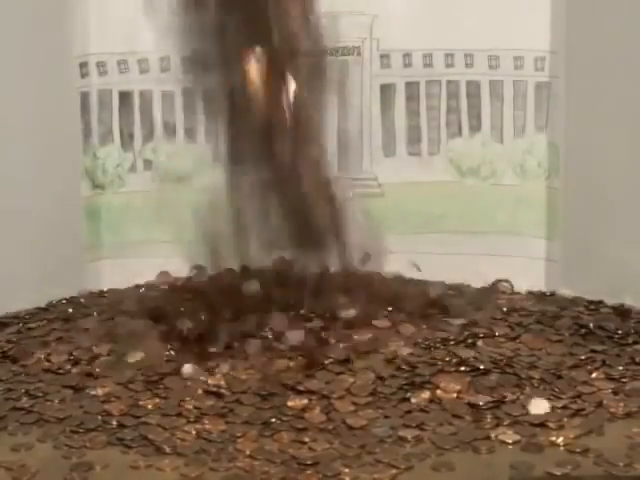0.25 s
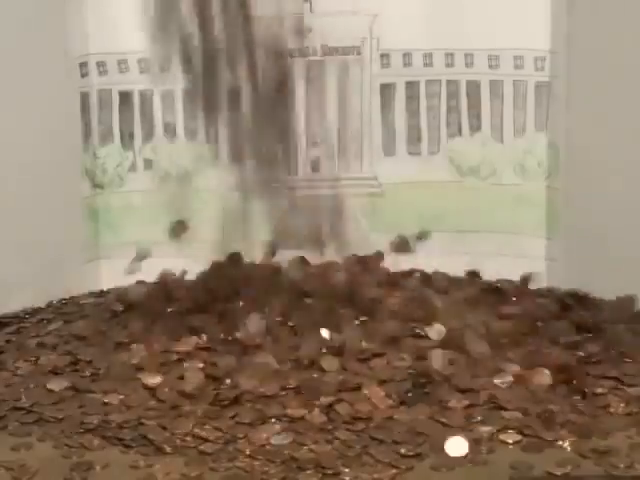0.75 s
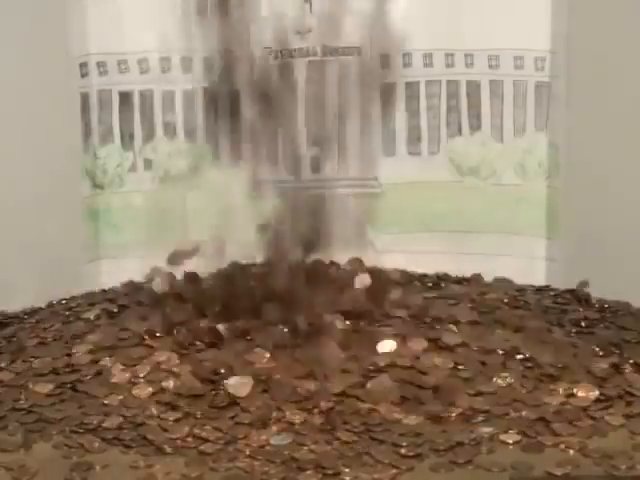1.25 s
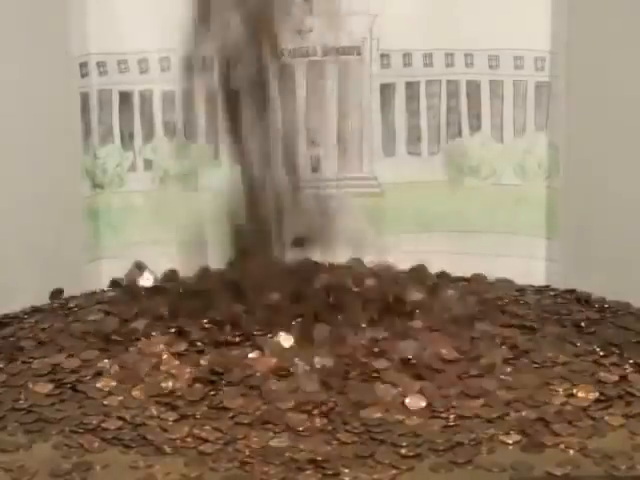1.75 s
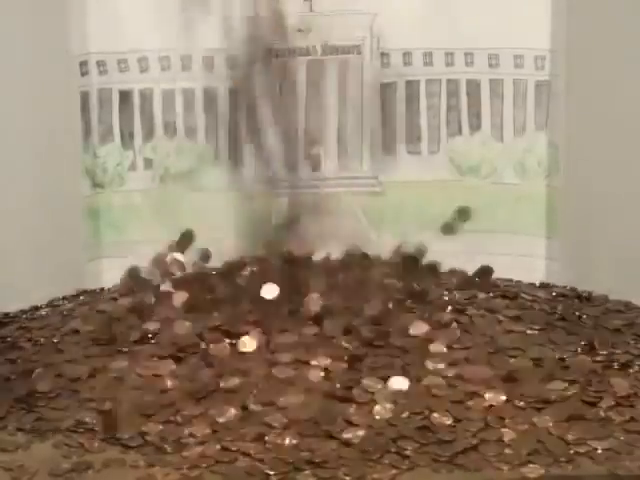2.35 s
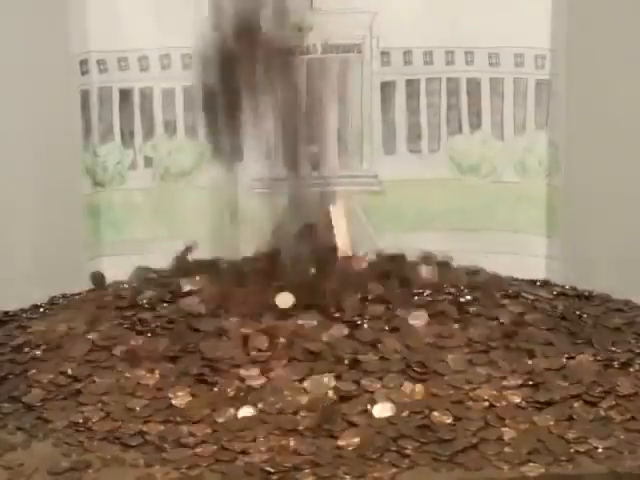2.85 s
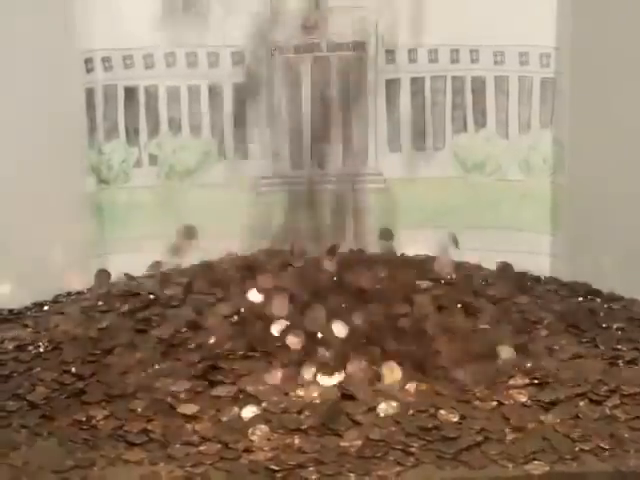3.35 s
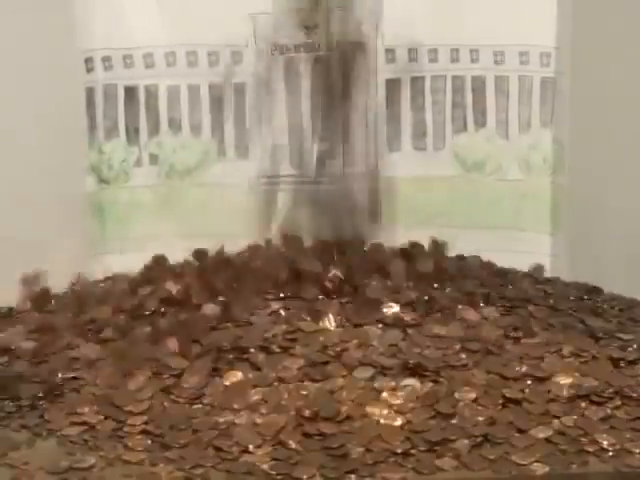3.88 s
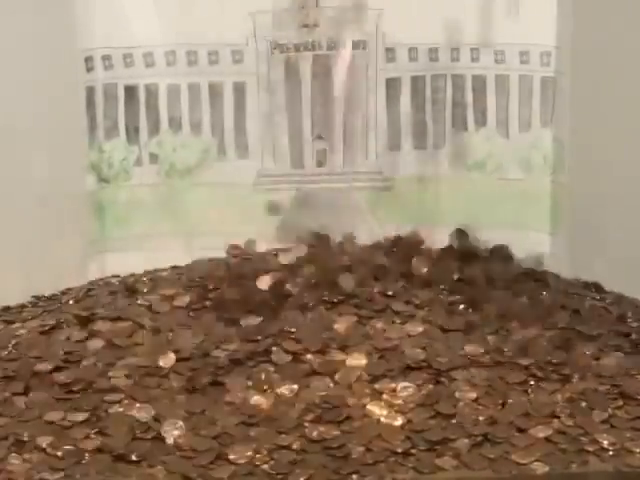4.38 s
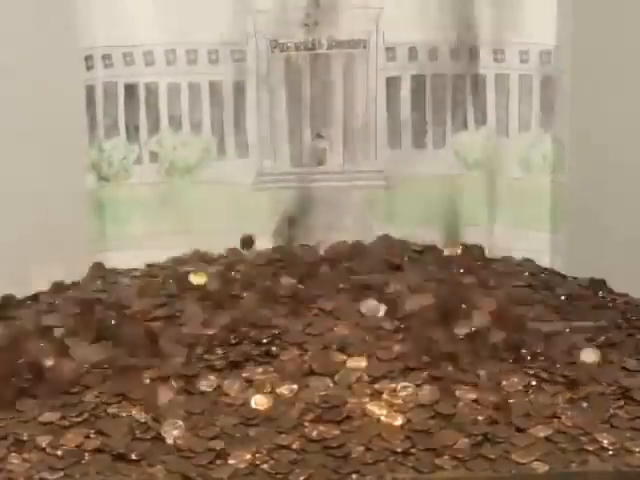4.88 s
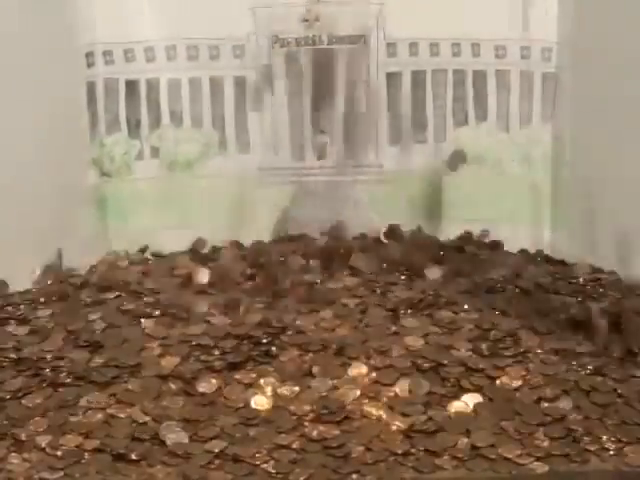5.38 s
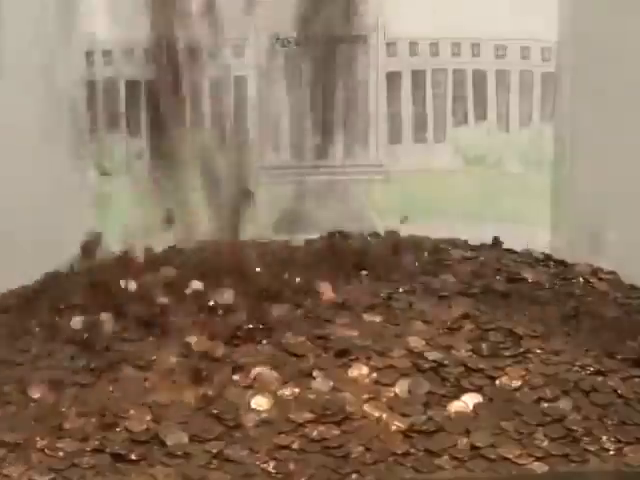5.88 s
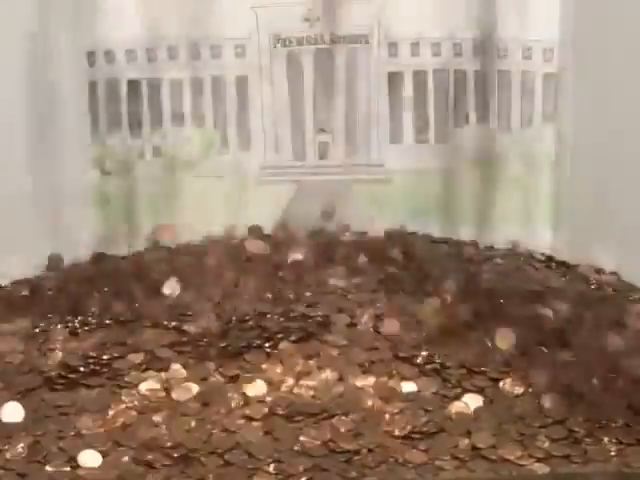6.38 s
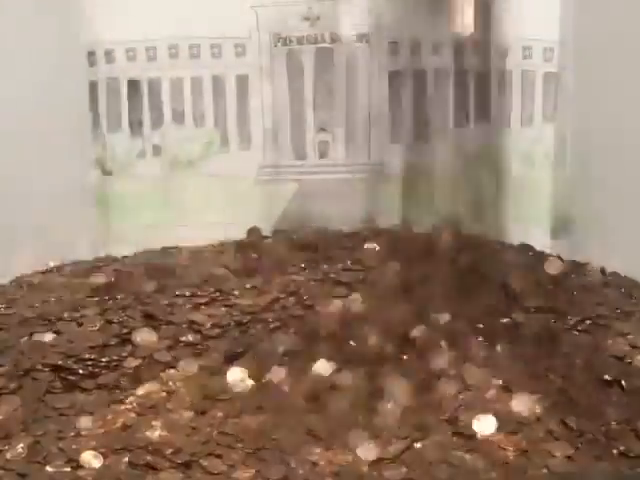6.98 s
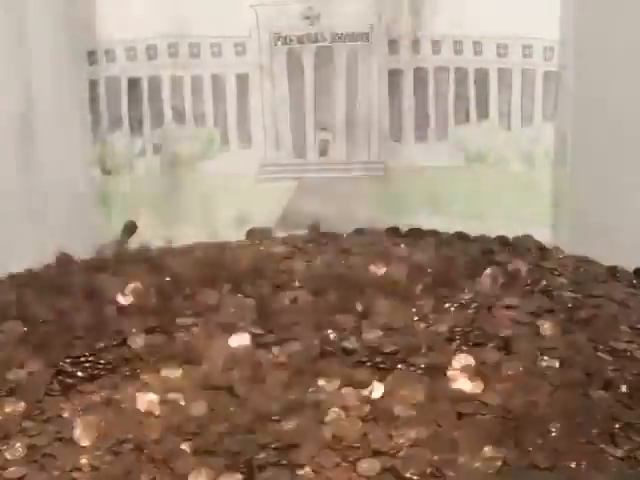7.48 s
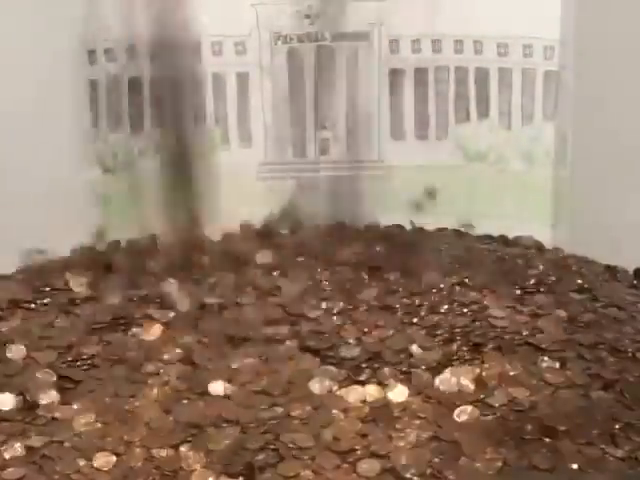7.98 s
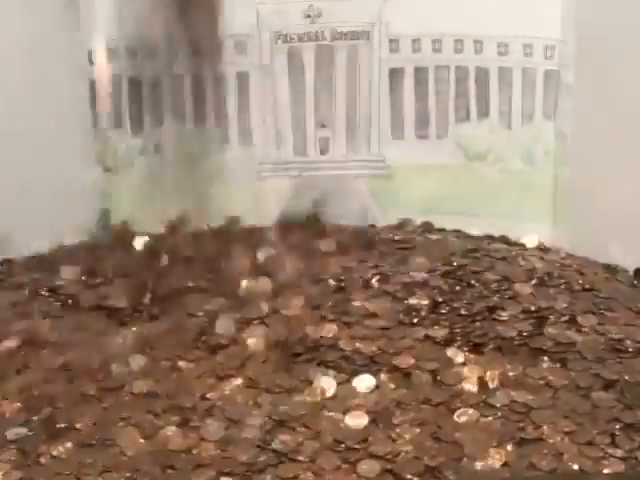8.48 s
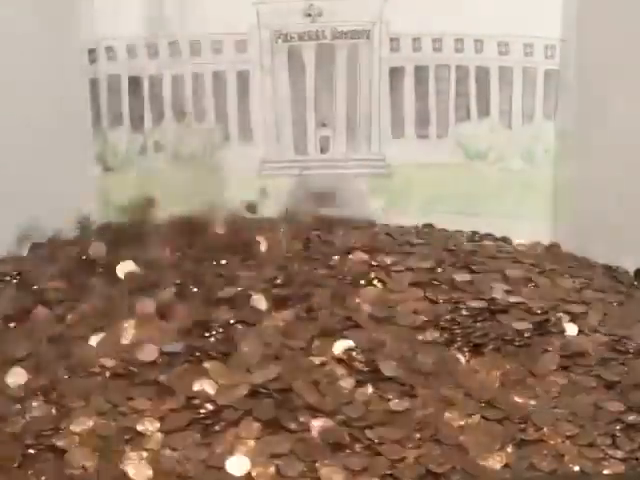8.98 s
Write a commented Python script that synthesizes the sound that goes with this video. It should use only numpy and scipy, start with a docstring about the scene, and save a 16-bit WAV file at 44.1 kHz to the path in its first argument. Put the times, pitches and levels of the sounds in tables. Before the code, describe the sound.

Heaps of coins pour onto a coin pile, first slowed to deep, hissy knocks and clatter, then brightening at full speed with brief silent dips.

```python
"""Coins pour onto a hard floor and a growing pile: knocks ring out, small collisions fizz above them.
Five joined passages play at quarter, half, then full speed; each join dips through silence.
Random collisions spit coin-coloured noise bursts, the rarer ones also ring the pile; near walls answer.
The coins sit centred between two channels, over room air and a low rumble made of random spectra.
Slowing brings the converter's ultrasonic hiss down into hearing, the same in both channels."""
import sys
import numpy as np
from scipy import signal
from scipy.io import wavfile
from scipy.ndimage import uniform_filter1d

SR = 44100
rng = np.random.default_rng(int(sys.argv[2]) if len(sys.argv) > 2 else 0)


def wav_record(signal):
    """Record a signal, one row per channel, as 16-bit PCM in the file named by sys.argv[1]."""
    frames = np.transpose(np.atleast_2d(signal))
    bounded = np.clip(frames, -1, 1)
    # unit amplitude maps onto the largest positive 16-bit level
    quanta = np.round(bounded * 32767).astype(np.int16)
    wavfile.write(sys.argv[1], SR, quanta)


N = 407476

# passages: [start t/s, playing speed as a fraction of full]
PASSAGES = [(0, .25), (1.98, .5), (4.285, 1), (5.615, 1), (8.12, 1)]
# centres of the silent dips between passages: [t/s]
JOIN_TIMES = [2.046, 4.347, 5.613, 8.119]
DIP_SLOPE_S = 0.086  # length of each slope into and out of a dip

# the stream between handfuls, before reflections: [t/s, clatter level/dB, rattle level/dB]
STREAM = [(0, -52, -53), (1.95, -56, -55), (2.4, -60, -54), (3.2, -46, -57), (3.45, -56, -60),
          (4.2, -54.5, -56.5), (4.6, -56, -64), (5.3, -51, -61), (5.56, -46, -42), (5.74, -42, -39),
          (6.04, -45, -43), (6.07, -50, -52), (6.32, -44, -39), (6.62, -53, -45), (6.7, -59, -60),
          (7.4, -56, -60), (7.5, -60, -64), (8.78, -57, -55), (8.81, -51, -47), (9.24, -47, -46)]
# handfuls that land together: [start t/s, rise and hold t/s, clatter level/dB, rattle level/dB]
HANDFULS = [(0.055, 0.07, -47, -51), (0.526, 0.022, -45.5, -48.5), (0.581, 0.032, -45, -56),
            (0.638, 0.068, -39.5, -47.5), (0.787, 0.058, -41, -53.5), (0.904, 0.023, -39, -47.5),
            (0.974, 0.058, -42, -51), (1.335, 0.034, -43.5, -55), (1.387, 0.037, -47, -56),
            (1.658, 0.03, -52, -54.5), (1.879, 0.041, -46.0, -53.5), (2.271, 0.033, -47, -55),
            (2.448, 0.11, -43.5, -49.5), (2.898, 0.051, -50.5, -58), (3.04, 0.029, -45, -54.5),
            (3.106, 0.057, -43, -49.0), (3.197, 0.042, -38.5, -50), (3.281, 0.043, -42, -53.0),
            (3.583, 0.04, -50, -63), (3.665, 0.15, -42, -46.0), (3.938, 0.15, -43, -50.5),
            (4.41, 0.042, -49, -59), (4.471, 0.059, -41, -46), (4.68, 0.084, -37, -43.0),
            (4.834, 0.06, -41, -47), (4.918, 0.035, -40.5, -47.0), (5.046, 0.1, -35, -45.5),
            (5.318, 0.05, -46, -52), (5.414, 0.098, -30.5, -27.5), (6.632, 0.07, -44, -54),
            (6.778, 0.063, -43.5, -55), (6.913, 0.049, -43, -50.5), (7.095, 0.052, -44, -52.5),
            (7.181, 0.12, -48, -54.5), (7.494, 0.07, -56, -46.5), (7.84, 0.053, -44.5, -44.5),
            (8.798, 0.022, -39, -38.5), (8.893, 0.093, -39.5, -46), (8.998, 0.051, -40, -45)]
LANDING_S = .006  # rise of a handful, as heard at any speed
DECAY_DB_PER_S = 310  # fall of a handful at full speed; follows the square root of the speed
# where the stream lands: [from t/s, clatter centre f/Hz at full speed, spread in log pitch,
# fizz over rattle level/dB, floor thud relative to clatter level/dB]
LANDING_SPOTS = [(0, 1620, .53, 5, -16), (1.98, 1790, .47, 4, -11), (4.285, 1900, .6, -3, -17),
                 (5.4, 1000, .7, -2, -24), (5.615, 1500, .74, 0, -23), (6.66, 1950, .5, -4, -19),
                 (8.12, 1080, .19, 1, -12), (8.79, 1560, .15, 4.5, -28)]
# top of the fizz in each passage: [f/Hz at full speed]
FIZZ_TOP_HZ = [13500, 13500, 13000, 13000, 16000]
# single knocks: [t/s, ring peak level/dB before tick and filter, heard centre f/Hz]
KNOCKS = [(0.058, -31, 300), (0.525, -32, 320), (0.637, -30.5, 347), (0.683, -31, 800), (0.783, -30, 530),
          (0.812, -28, 400), (0.994, -29.5, 606), (1.33, -32.5, 565), (1.584, -28.5, 345),
          (1.665, -30, 420), (1.993, -30, 1100), (2.012, -29, 1000), (2.227, -32.5, 1030),
          (2.278, -33.5, 705), (2.481, -27, 1100), (2.545, -28, 1130), (2.783, -29.5, 1150),
          (2.891, -26, 745), (2.953, -28.5, 1270), (3.058, -29, 1130), (3.194, -25, 1270),
          (3.586, -33, 600), (3.658, -32.5, 517), (3.704, -23, 900), (3.748, -22.5, 1090),
          (3.793, -25, 1100), (3.952, -22.5, 1100), (4.007, -26, 727), (4.039, -23.5, 894),
          (4.084, -33, 770), (4.254, -32, 1130), (4.284, -19, 867), (4.408, -29.5, 2220), (4.48, -24, 2320),
          (4.68, -27.5, 1270), (4.839, -28, 1290), (4.921, -29, 1100), (5.045, -25, 2250),
          (5.228, -28, 1310), (5.382, -31, 1720), (5.402, -27, 1850), (5.419, -17.5, 860),
          (5.451, -26, 880), (5.473, -26, 856), (5.503, -28, 856), (6.56, -25, 2450), (6.635, -26.5, 1040),
          (6.8, -27.5, 2320), (6.847, -32.5, 1050), (6.882, -29, 1850), (6.925, -21.5, 2150),
          (6.98, -30.5, 1840), (7.046, -25.5, 1880), (7.099, -35, 1370), (7.181, -24, 2290),
          (7.205, -26.5, 2360), (7.344, -27, 1330), (7.383, -29, 1880), (7.76, -33, 1390),
          (7.875, -27, 1390), (7.887, -25, 1350), (8.015, -31.5, 1080), (8.056, -28, 2500),
          (8.1857, -32, 2990), (8.2206, -36, 4570), (8.2351, -29.5, 5110), (8.2616, -29, 3400),
          (8.2895, -28.5, 3400), (8.3239, -36, 4880), (8.335, -44, 400), (8.3469, -28.5, 3500),
          (8.3588, -30.5, 4900), (8.3987, -31, 3820), (8.4441, -22, 4970), (8.497, -30.5, 3360),
          (8.5155, -35.5, 3360), (8.5289, -31.5, 3430), (8.5828, -34, 2550), (8.6043, -35.5, 3440),
          (8.6167, -28, 4940), (8.634, -27, 340), (8.651, -31, 300), (8.6671, -17, 2100),
          (8.6991, -34, 4320), (8.7664, -30, 4400), (8.7859, -29.5, 4930), (8.7993, -19, 1660),
          (8.8597, -29.5, 4400), (8.9196, -27, 1500), (8.937, -24, 1600), (8.9964, -33, 1580),
          (9.068, -28, 1600), (9.0957, -31, 4400)]
# modes of pile and floor at full speed, before detuning: [f/Hz, relative level/dB, t60/s]
PILE_MODES = [(335, -7, 0.08), (594, -7, 0.034), (860, -3, 0.051), (1044, -0.5, 0.033), (1320, 0.5, 0.022),
              (1600, 1.5, 0.016), (1900, 2.5, 0.013), (2250, 4.5, 0.014), (2540, 4, 0.02),
              (3050, 2.5, 0.011), (3580, 6, 0.014), (4300, 1, 0.019), (5090, 7, 0.015)]
# coin resonances at full speed: [f/Hz, width f/Hz, relative level/dB]
COIN_RESONANCES = [(5400, 500, -12.5), (7600, 430, 4.5), (8340, 330, 1), (10870, 940, -2),
                   (12650, 380, -20)]

# spectrum of the room air at full speed: [f/Hz, relative density level/dB]
AIR_SPECTRUM = [(110, -35), (180, -5), (305, -10), (577, 1), (709, -13), (1130, -25), (1320, -20),
                (1560, -26), (2490, -12.5), (2900, -14), (11400, -5), (14300, -10), (16000, -9)]
# air spectrum where the last passage stands, elsewhere in the room: [f/Hz, relative density level/dB]
LAST_AIR_SPECTRUM = [(110, -38), (180, -5), (367, -1), (599, -19), (994, -7), (1810, -9), (3430, -5),
                     (5910, -23), (8940, -17), (16000, -6)]
# air in each passage, before flicker: [level/dB]
AIR_LEVELS = [-37, -38.5, -40, -39.5, -48]
# spectrum of the rumble as heard at any speed: [f/Hz, relative density level/dB]
RUMBLE_SPECTRUM = [(15, -24), (40, 0.5), (75, -8.5), (120, -11.5), (180, -16), (320, -37), (700, -80)]
# course of the rumble, before flicker: [t/s, level/dB]
RUMBLE_LEVELS = [(0, -58), (1.9, -59), (2.1, -66), (3.5, -68), (3.78, -51), (5.2, -50), (5.66, -61),
                 (7.7, -58), (8, -52), (8.2, -60), (8.55, -46), (9, -60)]
# likeness of left and right in air and rumble: [f/Hz, likeness 0 to 1]
CHANNEL_LIKENESS = [(25, 0.54), (60, 0.38), (125, 0.53), (250, 0.86), (500, 1)]
# spectrum of the converter hiss as heard at quarter speed: [f/Hz, relative density level/dB]
HISS_SPECTRUM = [(2560, -63), (4350, -33), (4540, -33), (4840, -23.5), (5630, -14.5), (6370, -10),
                 (7090, -10), (8600, -12.5), (11700, -21), (12900, -16.5), (15100, -43), (15700, -50)]
# hiss at quarter and at half speed, before flicker: [level/dB]
HISS_LEVELS = [-22.5, -23.5]

NULL_HZ, EDGE_HZ = 16850, 15800  # converter null at full speed; upper band limit as heard
# constant voltage, one row a channel: [fraction of full scale]
CHANNEL_OFFSET = [
    [.0326],
    [-.0185],
]


def gain_of(db):
    """Amplitude ratio of a level in dB."""
    return 10 ** (np.asarray(db) / 20)


def evened(x):
    """Scale a signal to an RMS of one."""
    return x / np.sqrt(np.mean(x ** 2) + 1e-20)


def read(points, hz):
    """Read a frequency table, straight between its points over log frequency."""
    f, value = np.transpose(points)
    return np.interp(np.log(hz + 1), np.log(f + 1), value)


def add(mix, s, sound):
    """Lay a sound into the mix from s seconds on."""
    part = mix[round(s * SR):][:len(sound)]
    part += sound[:len(part)]


def band(x, lo_hz, hi_hz):
    """Pass the band between two frequencies."""
    edges = [lo_hz, min(hi_hz, SR / 2.1)]
    return signal.sosfilt(signal.butter(3, edges, "band", fs=SR, output="sos"), x)


def passage_at(s):
    """Index of the passage playing at s seconds."""
    return np.searchsorted(np.transpose(PASSAGES)[0], s, "right") - 1


def speed_at(s):
    """Playing speed at s seconds."""
    return np.transpose(PASSAGES)[1][passage_at(s)]


def noise(shape_db, level_db, same, flicker_db, patchy_db, size):
    """Two-channel noise from random short-time spectra; shape_db takes Hz, speed and frame time."""
    hop = size // 4
    hz = np.fft.rfftfreq(size, 1 / SR)[:, None]
    t = np.arange(N // hop + 5) * hop / SR
    a, b, c, d, patches = rng.standard_normal((len(t), len(hz), 5)).T
    # patches vary over time and frequency, flicker over time alone
    patches = uniform_filter1d(patches, size=9, axis=0)
    patches = evened(uniform_filter1d(patches, size=8, axis=1))
    flicker = evened(uniform_filter1d(rng.standard_normal(len(t)), size=3))
    shape = gain_of(shape_db(hz, speed_at(t), t))
    shape = shape / np.linalg.norm(shape, axis=0)
    shape = shape * gain_of(level_db(t) + flicker_db * flicker + patchy_db * patches)
    left = a + 1j * b
    right = same(hz) * left + np.sqrt(1 - same(hz) ** 2) * (c + 1j * d)
    spectra = np.array([left, right]) * shape / 2
    return signal.istft(spectra, nperseg=size, noverlap=size - hop)[1][:, :N]


def likeness_at(hz):
    """How alike the two channels are at a frequency."""
    return np.clip(read(CHANNEL_LIKENESS, hz), 0, 1)


def room_air():
    """Room noise whose spectrum shifts down with the speed; the last passage has its own spectrum."""
    def shape_db(hz, speed, t):
        return np.where(t < JOIN_TIMES[-1], read(AIR_SPECTRUM, hz / speed), read(LAST_AIR_SPECTRUM, hz))

    return noise(shape_db, lambda t: np.take(AIR_LEVELS, passage_at(t)),
                 likeness_at, 1.1, 3.0, size=2048)


def low_rumble():
    """Low noise that differs between the channels and swells and falls along its own course."""
    return noise(lambda hz, speed, t: read(RUMBLE_SPECTRUM, hz),
                 lambda t: np.interp(t, *np.transpose(RUMBLE_LEVELS)),
                 likeness_at, 2.5, 2.5, size=2048)


def converter_hiss():
    """Ultrasonic hiss brought down by slowing: it lies above the null and sinks 90 dB at full speed."""
    def shape_db(hz, speed, t):
        return read(HISS_SPECTRUM, hz / (4 * speed)) - 80 * (hz < NULL_HZ * speed)

    def level_db(t):
        return np.take(HISS_LEVELS, passage_at(t), mode="clip") - 90 * (speed_at(t) == 1)

    return noise(shape_db, level_db, np.ones_like, 1.8, 1.2, size=512)


def nearness(centre_hz, spread):
    """How strongly a blow centred on a pitch reaches each mode of the pile."""
    mode_hz = np.transpose(PILE_MODES)[0][:, None]
    return np.exp(-.5 * (np.log(mode_hz / centre_hz) / spread) ** 2)


def rings(speed):
    """One dying sine for each mode of the pile, a little detuned each time, lower and longer when slowed."""
    t = np.arange(int(.06 * SR / speed)) / SR * speed
    return np.array([gain_of(db - 60 * t / t60) * np.sin(2 * np.pi * hz * rng.normal(1, 0.038) * t)
                     for hz, db, t60 in PILE_MODES])


def pour(start, end, speed):
    """Random collisions: each spits a short burst that the coins colour, the rarer ones also ring the pile."""
    t = np.arange(start, end, 1 / SR)
    s, *columns = np.transpose(STREAM)
    clatter_db, rattle_db = (np.interp(t, s, column) for column in columns)
    since, *colour = np.transpose(LANDING_SPOTS)
    spot = np.searchsorted(since, t, "right") - 1
    centre_hz, spread, fizz_db, thud_db = np.array(colour)[:, spot]
    clatter, rattle = gain_of(clatter_db), gain_of(rattle_db)
    fizz = rattle * gain_of(fizz_db)

    for s, length, low_db, high_db in [row for row in HANDFULS if start <= row[0] < end]:
        # rises quickly, holds, then dies away; powers add to the stream
        landing = np.clip((t - s) / LANDING_S, 0, 1)
        dying_db = DECAY_DB_PER_S * speed ** .5 * np.maximum(t - s - length, 0)
        shape = landing * gain_of(-dying_db)
        clatter = np.hypot(clatter, gain_of(low_db) * shape)
        rattle = np.hypot(rattle, gain_of(high_db) * shape)
        fizz = np.hypot(fizz, gain_of(high_db - 1) * shape)

    # mean collisions per second at full speed: 2500 spit, 950 of these also ring the pile
    size = gain_of(3.8 * np.minimum(rng.exponential(1, len(t)), 5))
    chance = rng.random(len(t)) * SR / speed
    reach = nearness(centre_hz, np.maximum(spread, .1))
    reach_share = reach / np.linalg.norm(reach, axis=0)
    blows = size * (chance < 950) * reach_share * rng.standard_normal(reach.shape)
    rung = signal.oaconvolve(blows, rings(speed), axes=1).sum(axis=0)[:len(t)]

    spit = gain_of(-60 * np.arange(int(800 / speed)) / SR * speed / 0.019)
    bursts = signal.oaconvolve(size * (chance < 2500), spit)[:len(t)]
    bursts = bursts * rng.standard_normal(len(t))
    for hz, width, db in COIN_RESONANCES:
        b, a = signal.iirpeak(hz * speed, hz / width, SR)
        bursts = bursts + gain_of(db) * 0.25 * signal.lfilter(b, a, bursts)

    fizz_top_hz = FIZZ_TOP_HZ[passage_at(start)] * speed
    pile_clatter = clatter * evened(band(rung, 600 * speed, 4000 * speed))
    floor_thud = clatter * gain_of(thud_db) * evened(band(bursts, 320 * speed, 560 * speed))
    coin_rattle = rattle * evened(band(bursts, 3000 * speed, 7000 * speed))
    coin_fizz = fizz * evened(band(bursts, 7000 * speed, fizz_top_hz))
    return pile_clatter + floor_thud + coin_rattle + coin_fizz


def knock(s, db, hz):
    """A ragged contact rings the modes near its pitch; a bright tick rides on top."""
    speed = speed_at(s)
    t = np.arange(int(700 / speed)) / SR * speed
    contact, tick = rng.standard_normal((2, len(t)))
    contact = contact * np.minimum(t / .0007, 1) * gain_of(-60 * t / 0.013)
    near = nearness(hz / speed, 0.37)[:, 0] * rng.uniform(0.22, 1, len(PILE_MODES))
    ring = signal.oaconvolve(contact, near @ rings(speed))
    ring = ring / abs(ring).max()
    tick = band(tick * gain_of(-60 * t / 0.014), 2000 * speed, 9500 * speed)
    add(ring, 0, gain_of(-2.5) * tick / abs(tick).max())
    return s, gain_of(db) * band(ring, .42 * hz, 16600)


def room(x, speed):
    """Sparse reflections of random sign from near walls, stretched when slowed."""
    t = np.arange(int(.2 * SR / speed)) / SR * speed
    signs = rng.choice([-1., 1.], len(t))
    taps = signs * (rng.random(len(t)) < .06) * gain_of(-60 * t / 0.075) * (t > .003)
    reflected = signal.oaconvolve(x, taps / np.linalg.norm(taps))[:len(x)]
    return x + gain_of(-9.5) * reflected


def scene():
    """Pour and knocks share the room's reflections, passage by passage; the backgrounds lie under them."""
    knocks, coins = np.zeros(N), np.zeros(N)
    for row in KNOCKS:
        add(knocks, *knock(*row))
    ends = [start for start, _ in PASSAGES[1:]] + [N / SR]
    for (start, speed), end in zip(PASSAGES, ends):
        poured = pour(start, end, speed)
        add(poured, 0, knocks[round(start * SR):][:len(poured)])
        add(coins, start, room(poured, speed))
    return coins + room_air() + low_rumble() + converter_hiss()


def record(dry):
    """The slowed converter null, straight fades through each join, the band limit, a constant offset."""
    t = np.arange(N) / SR
    played = dry
    for speed in (.25, .5):
        b, a = signal.iirnotch(NULL_HZ * speed, 9, SR)
        nulled = signal.lfilter(b, a, signal.lfilter(b, a, dry))
        played = np.where(speed_at(t) == speed, nulled, played)
    from_join_s = abs(t[:, None] - JOIN_TIMES).min(axis=1)
    fade = np.minimum(from_join_s / DIP_SLOPE_S, 1)
    edge = signal.firwin(511, EDGE_HZ, window=("kaiser", 9), fs=SR)
    limited = signal.oaconvolve(played * fade, edge[None], "same")
    return limited + fade * CHANNEL_OFFSET  # the offset fades at the joins too


dry = scene()
out = record(dry)
wav_record(out)
```